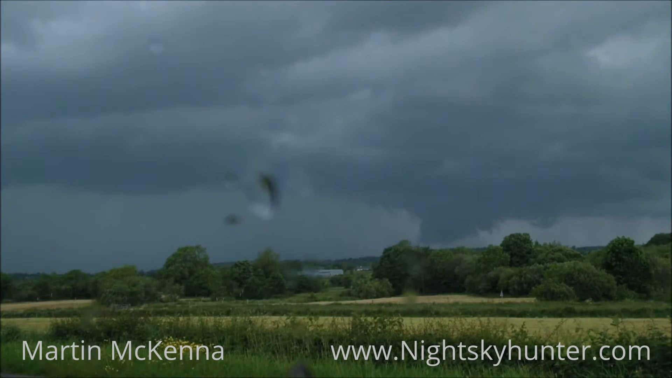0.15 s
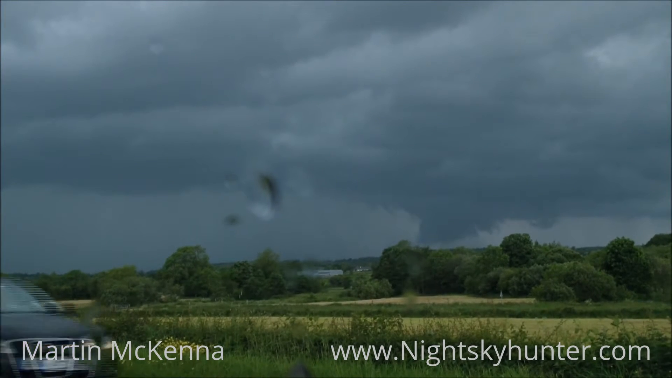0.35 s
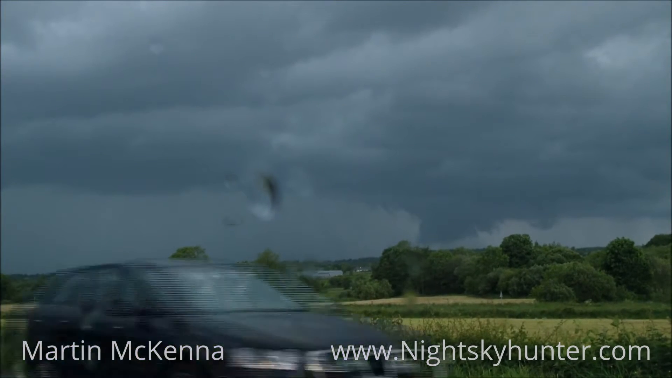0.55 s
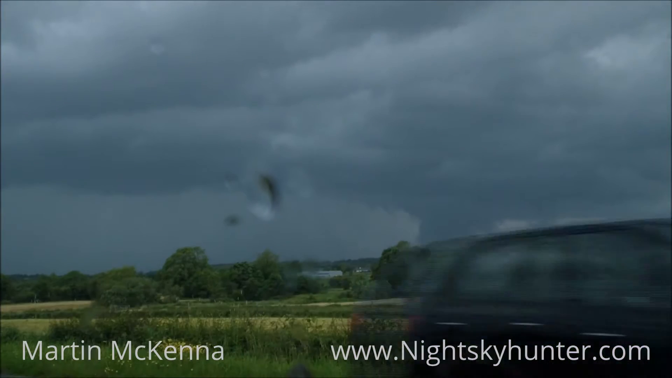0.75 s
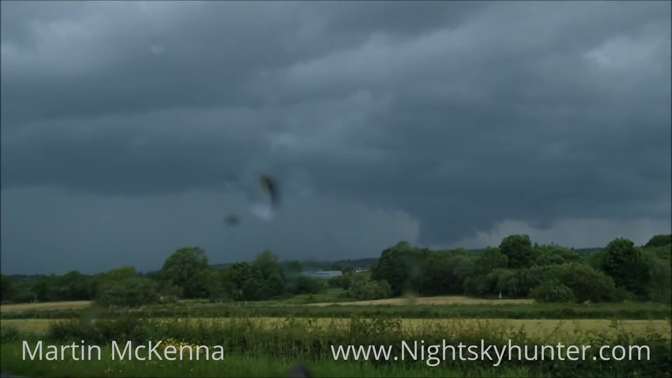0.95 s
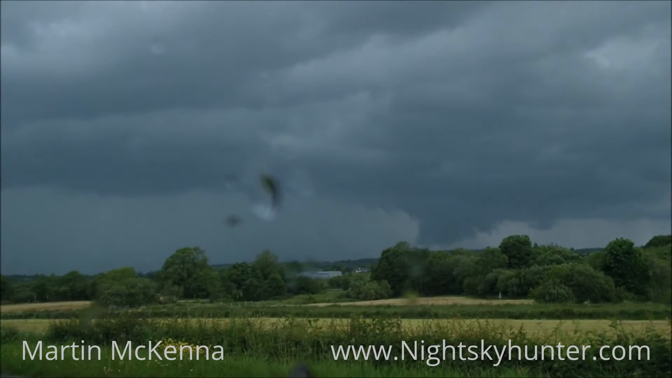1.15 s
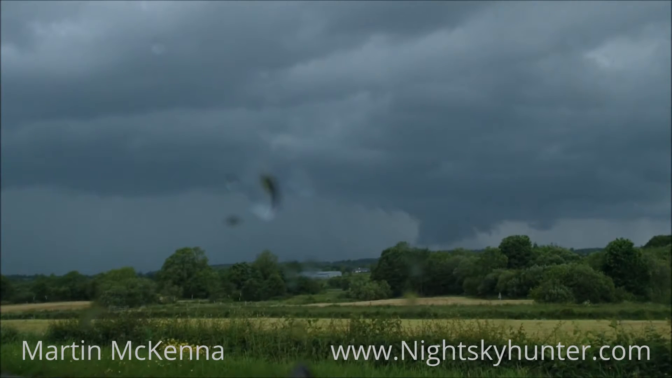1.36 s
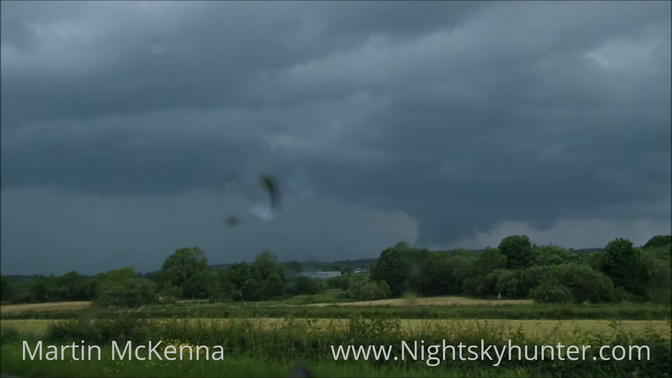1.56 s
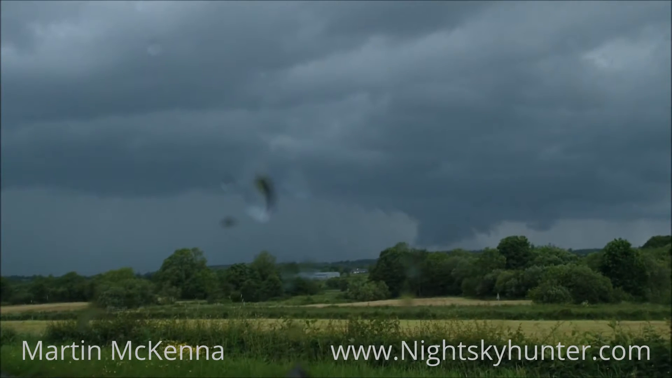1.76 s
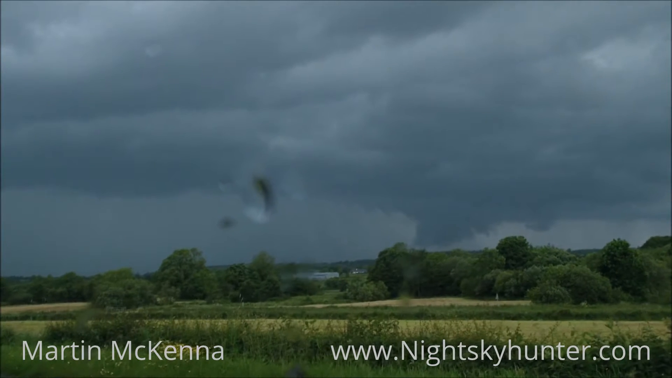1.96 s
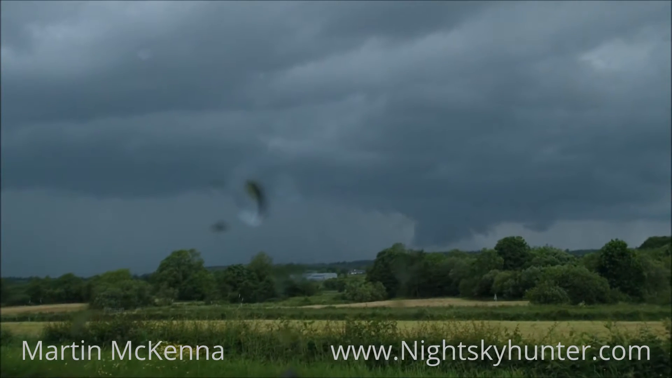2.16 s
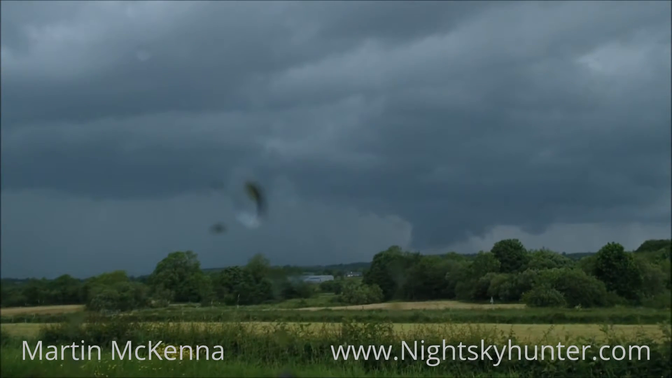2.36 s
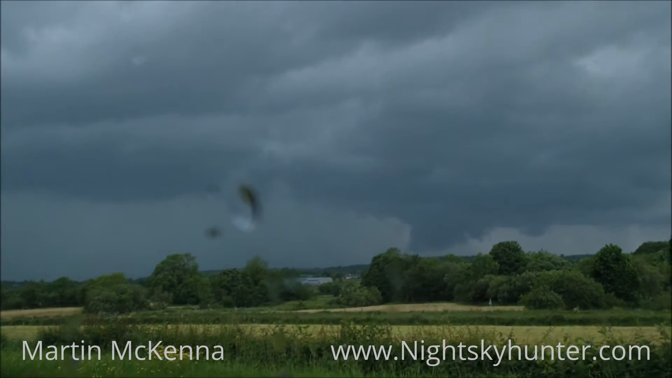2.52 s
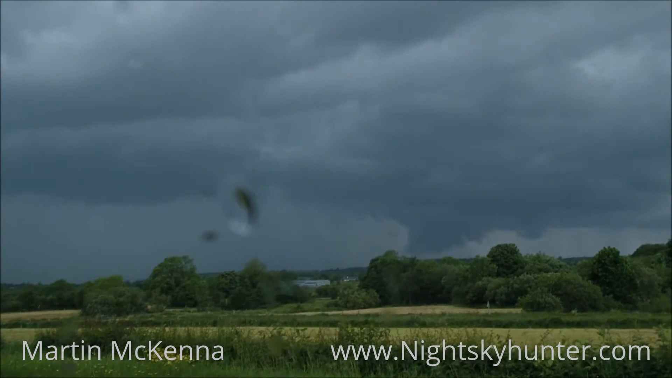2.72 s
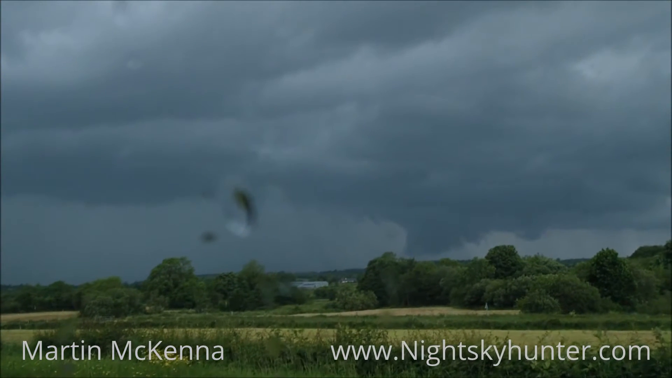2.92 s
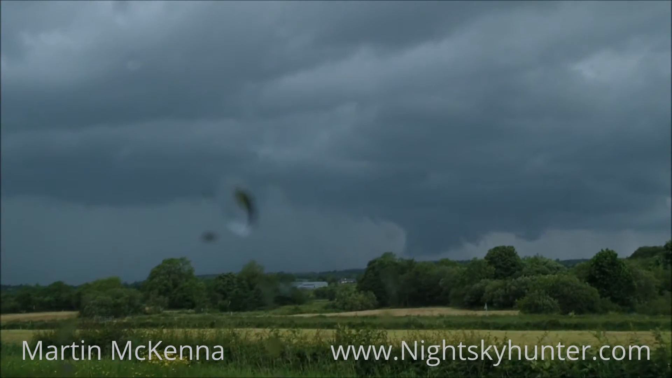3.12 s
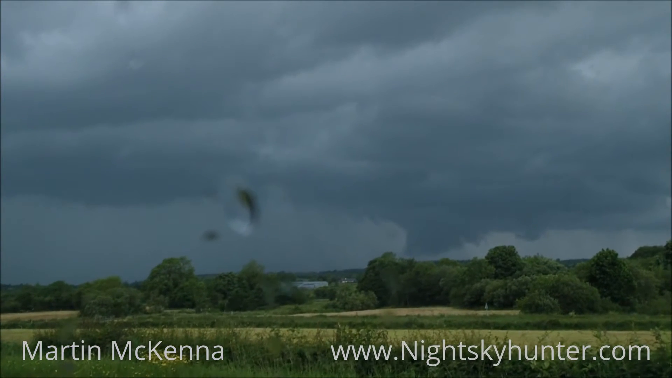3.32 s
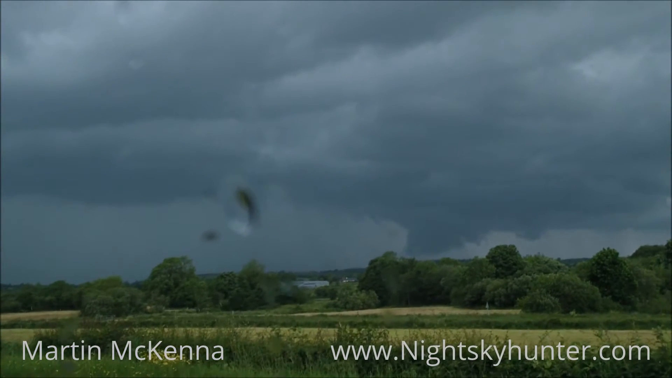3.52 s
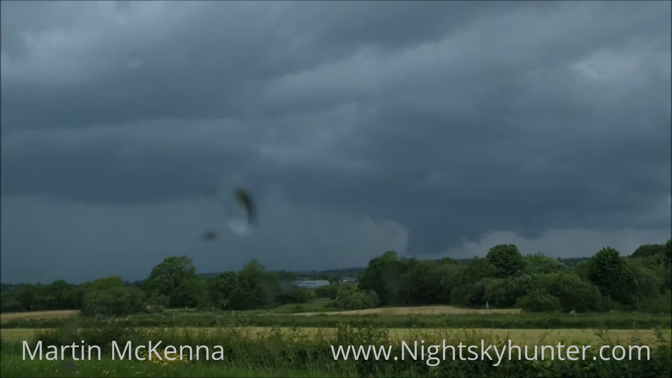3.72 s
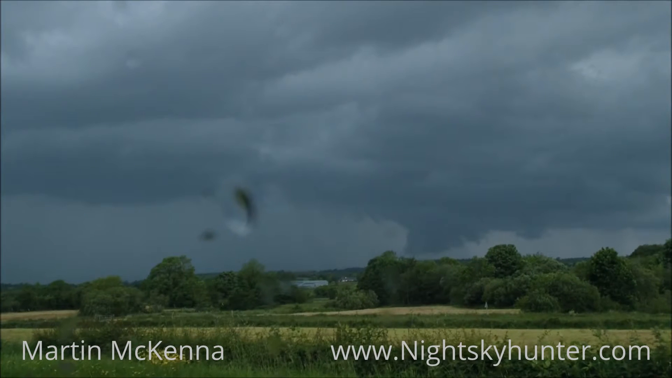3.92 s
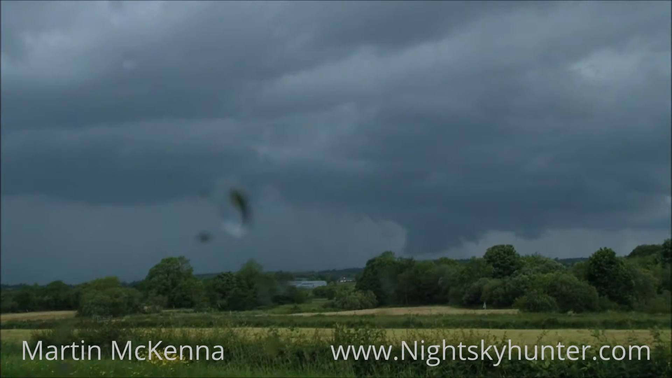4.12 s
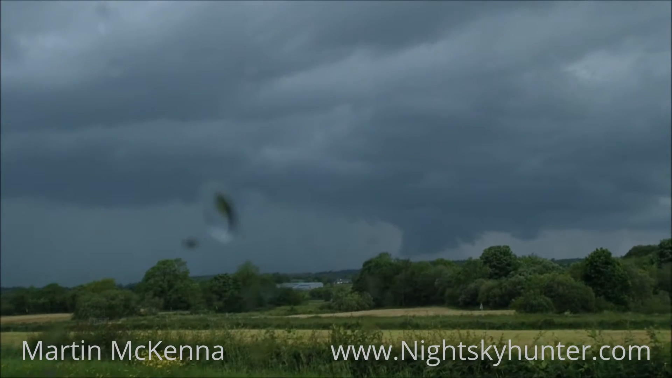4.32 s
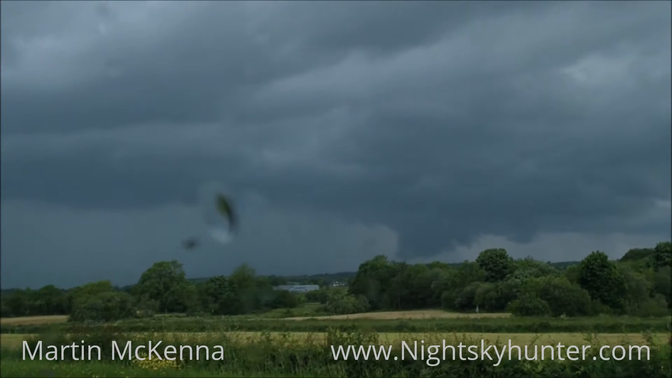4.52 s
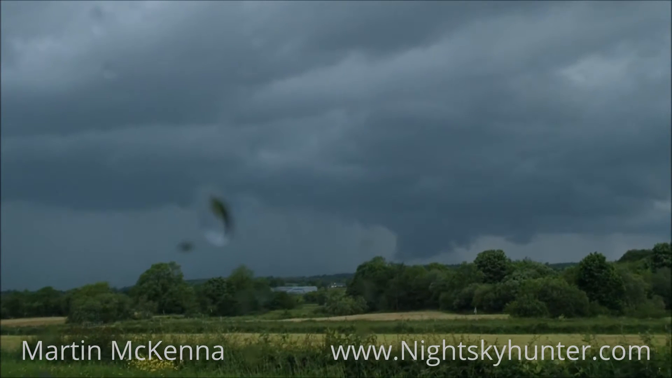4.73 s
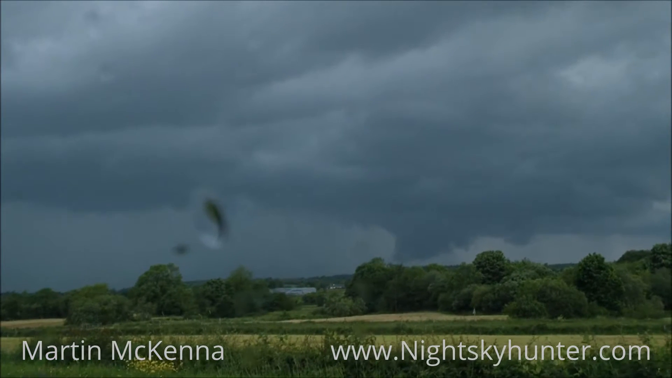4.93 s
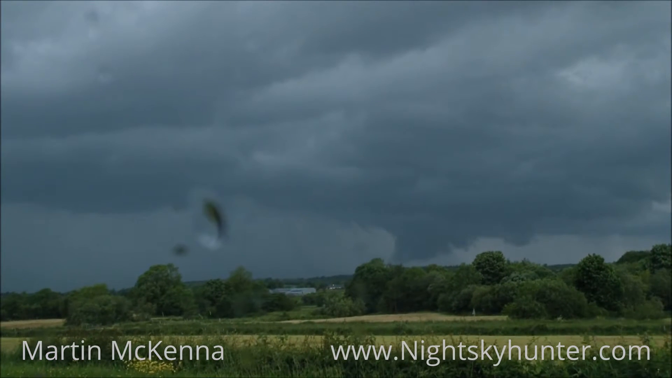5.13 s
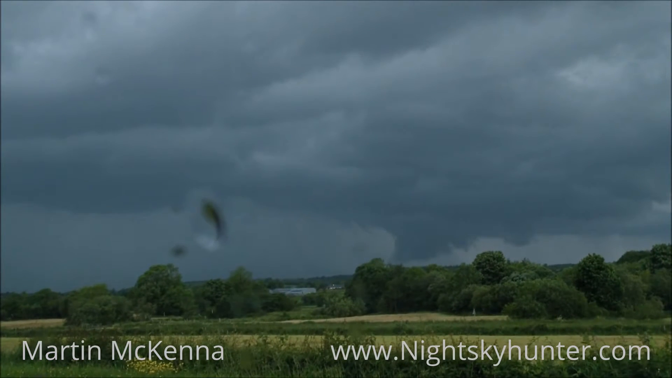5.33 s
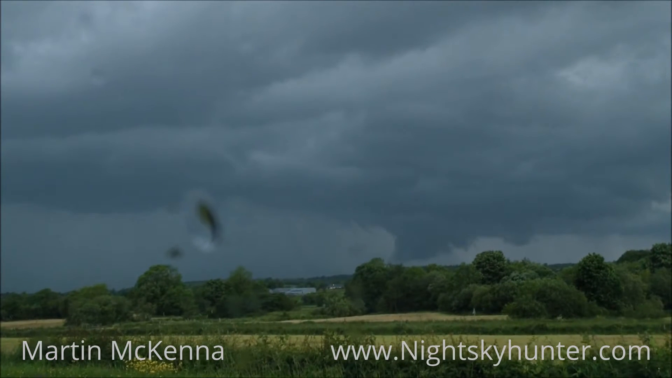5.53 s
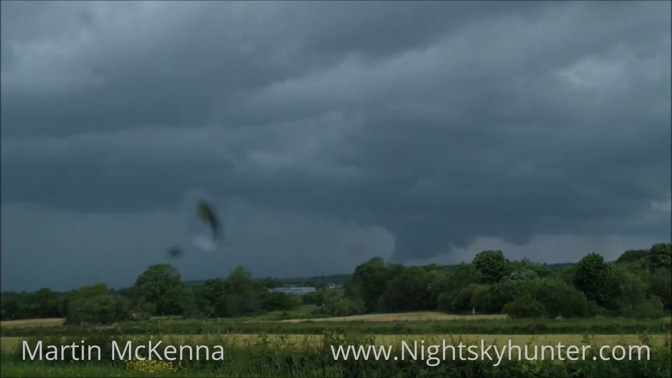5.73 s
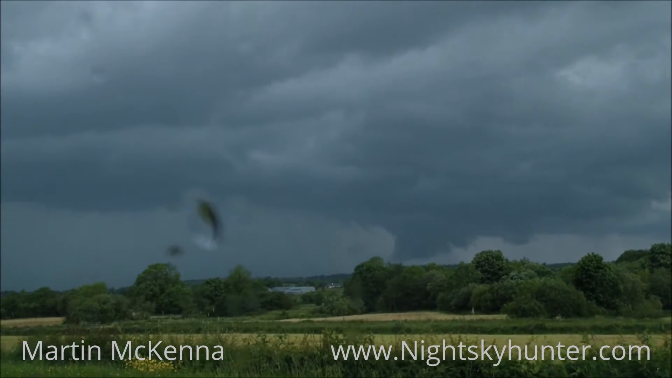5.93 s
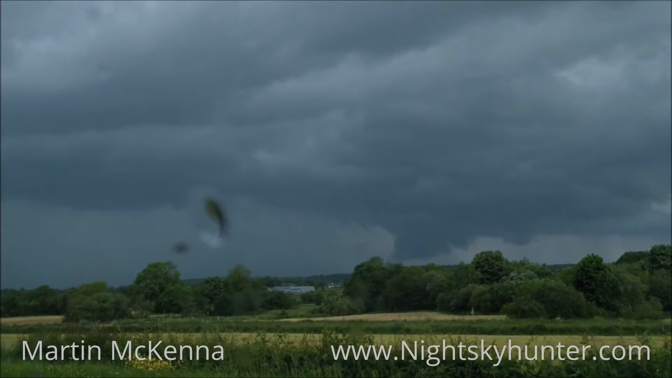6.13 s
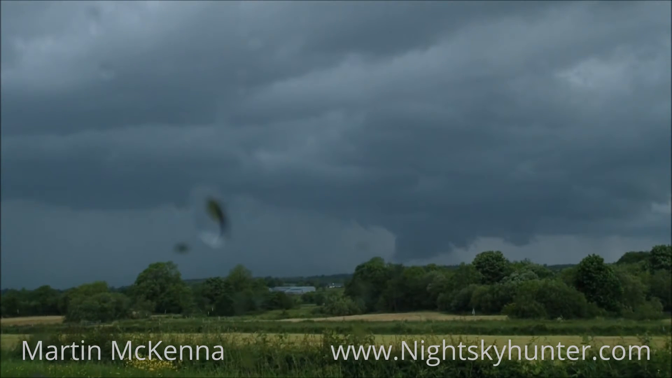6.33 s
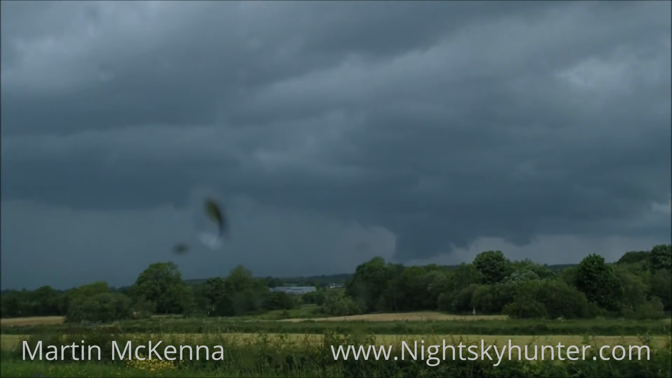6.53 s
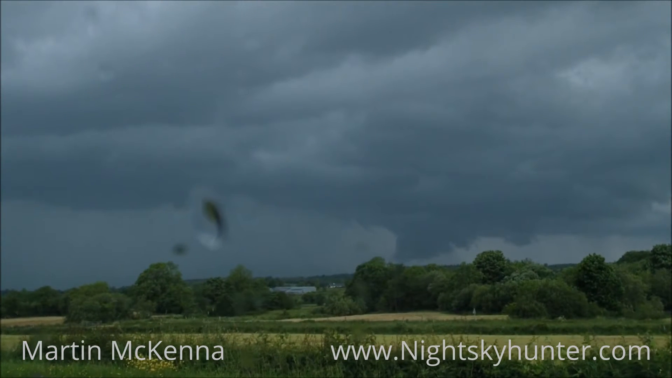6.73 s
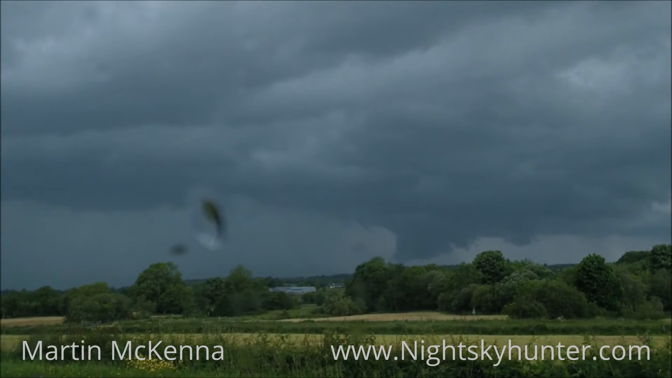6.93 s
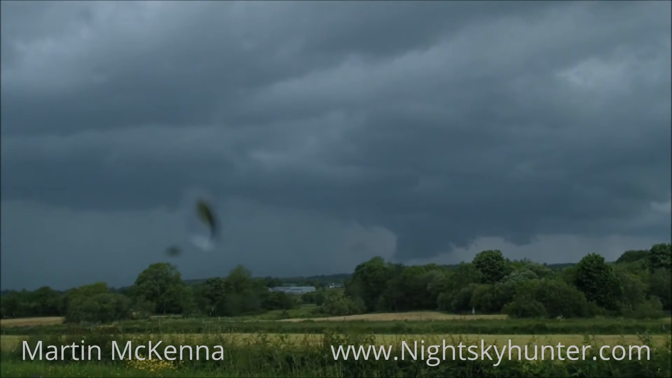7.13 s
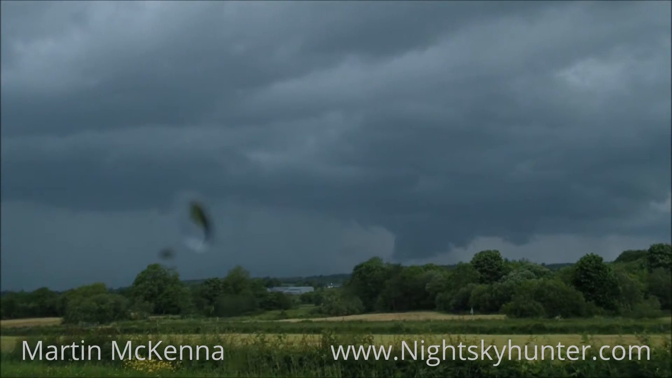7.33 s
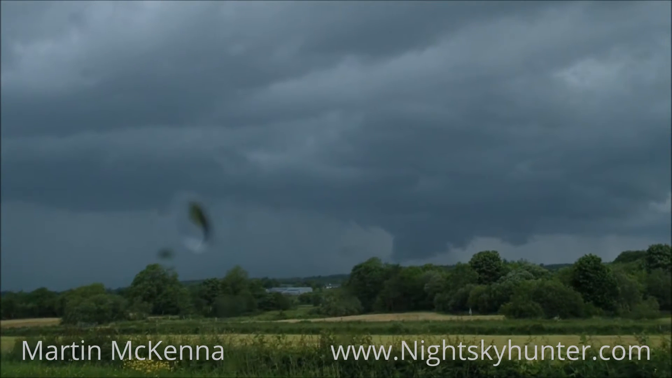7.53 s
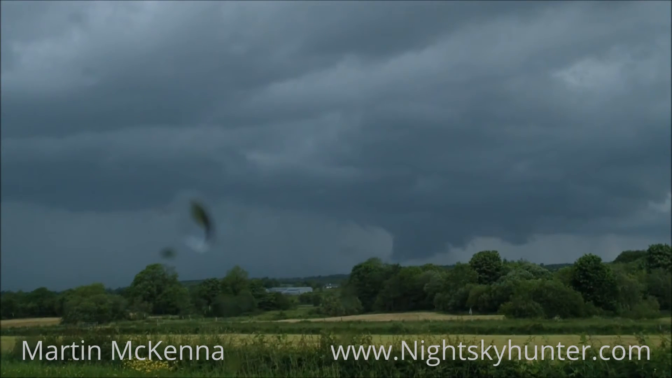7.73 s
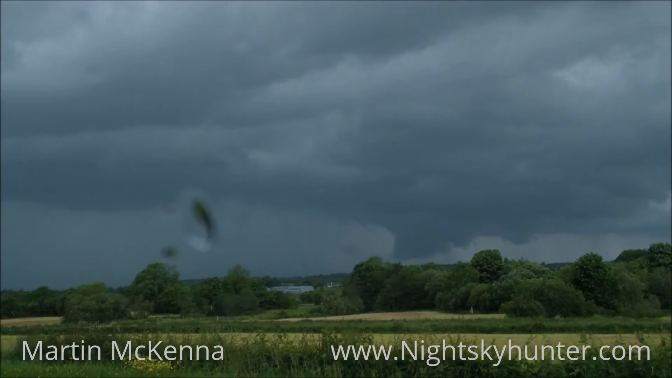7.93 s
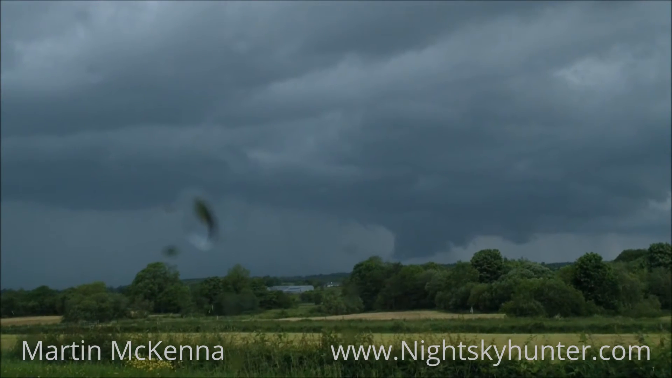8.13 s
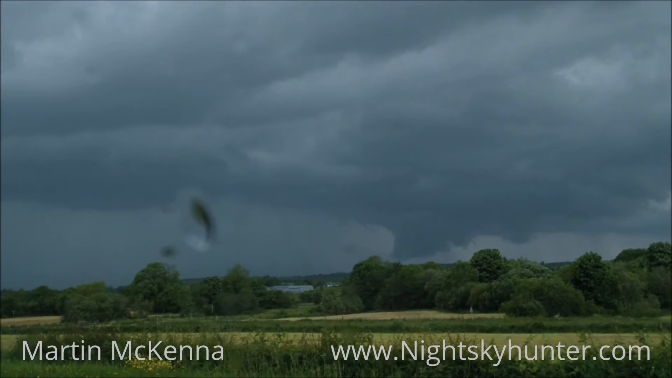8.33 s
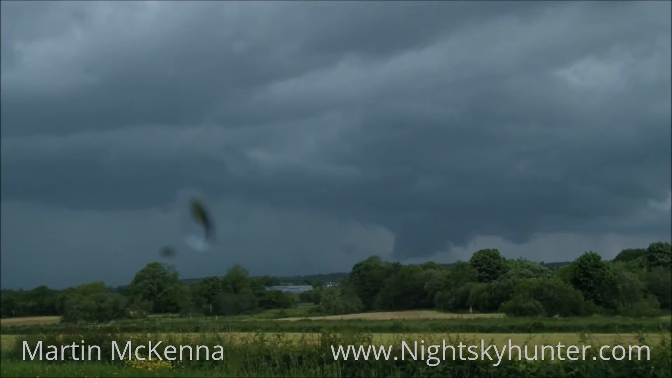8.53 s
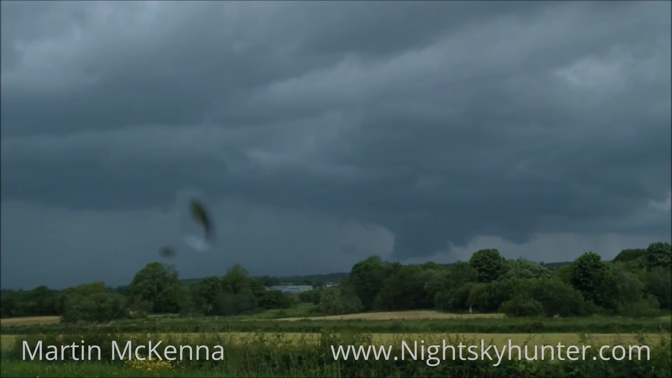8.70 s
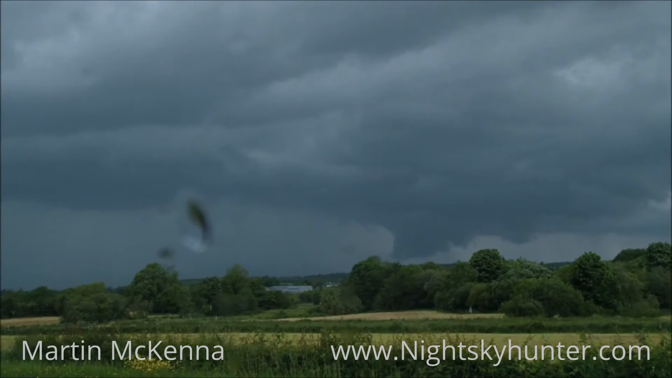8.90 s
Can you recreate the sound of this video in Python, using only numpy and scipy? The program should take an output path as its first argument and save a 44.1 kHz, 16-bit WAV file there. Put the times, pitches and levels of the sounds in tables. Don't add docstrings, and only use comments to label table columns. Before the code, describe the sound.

Close car pass-by heard from inside a parked car, tyre roar swelling and receding, followed by hand scrapes, clicks, knocks, drops and faint hiss.

```python
import sys
import numpy as np
from scipy import signal
from scipy.fft import rfft, irfft, next_fast_len
from scipy.io import wavfile
from scipy.ndimage import uniform_filter1d

SR = 44100
rng = np.random.default_rng(int(sys.argv[2]) if len(sys.argv) > 2 else 0)


def transcribe(u):
    v = np.clip(np.atleast_2d(u).T, -1, 1)
    q = np.round(v * 32767).astype(np.int16)
    wavfile.write(sys.argv[1], SR, q)


def boost_factor(decibels):
    exponent = np.asarray(decibels, float) / 20
    return 10 ** exponent


N = 399546
TIME = np.arange(N) / SR
LONG = next_fast_len(N, real=True)
FREQ = np.maximum(np.arange(LONG // 2 + 1) * SR / LONG, 1.)


def set_rms(x, db):
    return x * boost_factor(db) / np.sqrt(np.mean(x ** 2))


def wave(spectrum):
    return irfft(spectrum, LONG)[..., :N]


def curve(rows):
    s, *columns = np.transpose(rows)
    return np.array([np.interp(TIME, s, c) for c in columns])


def slope(hz, points):
    table_hz, table_db = np.array(points).T
    return np.interp(np.log(hz), np.log(table_hz), table_db)


def resonant(hz, modes):
    response = 1
    for mode_hz, width_hz, db in modes:
        response = response * (1 + (boost_factor(db) - 1) / (1 + 1j * (hz ** 2 - mode_hz ** 2) / (hz * width_hz)))
    return response


def walk(rate, size=N):
    k = int(SR / rate)
    held = np.repeat(rng.standard_normal(size // k + 1), k)
    return uniform_filter1d(uniform_filter1d(held, k), k)[:size]


def swell(start_s, length_s):
    return np.sin(np.pi * np.clip((TIME - start_s) / length_s, 0, 1))


def ring(t, hz, t60, rise_s):
    return (1 - np.exp(-t / rise_s)) * 1000 ** (-t / t60) * np.sin(2 * np.pi * hz * t)


def apart(hz, corner_hz=7500, least=0.035):
    return least + (1 - least) / np.sqrt(1 + (corner_hz / hz) ** 3)


def ports(mid, side):
    return np.array([mid + side, mid - side])


def add(out, s, x):
    i = int(s * SR)
    out[..., i:i + x.shape[-1]] += x[..., :N - i]


SPEED_M_S, KERB_M, ABEAM_S = 18, 3.11, .8


def passing(lag_s):
    along = SPEED_M_S * (TIME - ABEAM_S - lag_s)
    r = np.hypot(along, KERB_M)
    return r, -along / r


# t/s, level/dB
SCREEN = [(0, 0), (.22, 1), (.5, 1.5), (.65, -1), (.9, -1), (1.15, 2.5), (1.3, 0.5), (1.5, -2), (1.8, -2),
          (2.2, -0.5), (2.35, -3), (3.0, -3), (3.4, -2), (4.75, -1.5), (5.3, -4), (6.4, -13), (9.06, -17)]
# level abeam/dB, share of the path loss, extra level ahead of the car/dB,
# level of far traffic/dB
LAYERS = [
    (-27.5, 1.17, -2, -51.5),
    (-26.5, 0.99, 5.5, -53.5),
    (-22.5, 0.75, 7, -50),
    (-36, 1.34, 2.5, -64),
]
SPREAD_M = 3.74


def loudness():
    r, coming = passing(0)
    loss = curve(SCREEN)[0] - 20 * np.log10(np.hypot(r, SPREAD_M) / np.hypot(KERB_M, SPREAD_M))
    ahead = np.clip(2 * coming, 0, 1)
    layers = []
    for db, share, ahead_db, far_db in LAYERS:
        power = boost_factor(2 * (db + share * loss + ahead_db * ahead)) + boost_factor(2 * far_db)
        layers.append(10 * np.log10(power))
    return layers


LAYER_HZ = (70, 350, 950, 4000)
# f/Hz, level/dB per Hz
CAR_COLOUR = [(20, -5.5), (40, -12.5), (130, -10.5), (210, -10), (330, -18.5), (550, -18), (1020, -17.5),
              (1490, -27), (2100, -30.5), (2500, -34), (4800, -45), (5600, -47.5), (11000, -54),
              (16000, -63)]
# f/Hz, width/Hz, level/dB
CABIN = [(60, 6.6, 6.5), (83, 14, 4), (112.6, 7.7, 6), (237, 25, 2.5), (327, 24, 4), (399.4, 61, -10),
         (459.7, 21.6, 7.5), (622, 13, 5.5), (716.3, 9.2, 10.5), (766.4, 15.4, 7.5), (823.5, 18, 10),
         (903.6, 9.9, 13.5), (950.2, 14.2, 10.5), (988.7, 21.2, 11), (1024.5, 5.4, 11.5), (1085, 22, 1),
         (1223.5, 32, 9), (1337, 23.5, 8.5), (1377, 29, 3.5), (1507, 24, 8), (1744, 33, 7.5),
         (2090, 31, 3.5), (2280, 420, -2.5), (3170, 84, 4.5)]


def road():
    flicker_db, smooth_hz, steady_within_m = 2.0, 900, 30
    loud = loudness()
    shimmer = np.clip(passing(0)[0] / steady_within_m, .25, 1)
    colour = boost_factor(slope(FREQ, CAR_COLOUR)) * resonant(FREQ, CABIN)
    mid, side = rfft(rng.standard_normal((2, LONG))) * colour / np.sqrt(N)
    pair = ports(mid, apart(FREQ) * side)
    rms = []
    for low_hz, high_hz in [(25, 140), (230, 550), (600, 1500), (2500, 7000)]:
        inside = (FREQ > low_hz) & (FREQ < high_hz)
        rms.append(np.sqrt(2 * np.sum(np.abs(colour[inside]) ** 2) / N))
    out = 0
    for step in range(-1, 20):
        hz = 25 * 2 ** (step / 2)
        window = np.cos(np.pi * np.clip(np.log2(FREQ / hz), -.5, .5)) ** 2
        place = np.interp(np.log(hz), np.log(LAYER_HZ), range(4))
        k = min(int(place), 2)
        share = place - k
        flicker = flicker_db * shimmer * min(1, (smooth_hz / hz) ** .5) * walk(14)
        db = (1 - share) * loud[k] + share * loud[k + 1] + flicker
        gain = boost_factor(db) / (rms[k] ** (1 - share) * rms[k + 1] ** share)
        out = out + gain * wave(window * pair) * np.sqrt(N)
    return out


# t/s, length/s, f/Hz, width/Hz, level/dB
FACING = [(-0.13, 0.81, 4150, 610, -47.5), (-0.9, 1.75, 7600, 1200, -51), (-.5, 1.3, 1570, 530, -34),
          (0.4, 0.52, 2660, 300, -38), (0.8, 2, 3500, 400, -58), (0.8, 1.3, 5260, 550, -61),
          (0.64, 0.51, 236, 98, -25.5), (0.6, 0.67, 9000, 2500, -52), (1.1, .27, 7000, 2000, -51),
          (0.7, .13, 8000, 4000, -47), (1.5, 0.34, 3200, 60, -54), (0.27, 0.37, 826, 55, -25),
          (1.9, 0.69, 3200, 60, -62), (3, 2.04, 400, 7.3, -50.5), (0.5, 0.52, 615, 77, -26),
          (-0.09, 0.88, 1095, 56, -24), (0.13, 0.33, 800, 80, -30), (1.94, 0.36, 810, 70, -39),
          (0.9, 0.24, 322, 13, -30), (0.3, 0.17, 314, 16, -33), (0.3, 0.44, 220, 71, -31),
          (0.51, 0.58, 166, 29, -22.5), (-0.12, 0.31, 950, 93, -20.5)]


def facing():
    mid, side = rfft(rng.standard_normal((2, LONG)))
    noise = ports(mid, apart(FREQ) * side)
    out = 0
    for s, length, hz, width, db in FACING:
        band = noise * np.exp(-((FREQ - hz) / width) ** 2)
        out = out + swell(s, length) * set_rms(wave(band), db)
    return out


# t/s, f/Hz
REVS = [
    (0, 180),
    (2.2, 180),
    (2.9, 183),
    (3.8, 185.4),
    (4.7, 186.8),
    (5.4, 185.3),
    (7, 180),
    (9.06, 179),
]
# t/s, level/dB
THROTTLE = [(0, -36), (.4, -28), (.58, -28), (.76, -15), (.88, -11.5), (1.0, -13), (1.11, -16.5),
            (1.25, -24), (1.55, -32), (1.75, -30.5), (2.05, -42.5), (2.4, -45), (2.9, -39), (3.35, -44),
            (3.8, -39.5), (4.45, -43), (4.95, -47.5), (5.3, -56.5), (9.06, -52)]
# t/s, length/s, f/Hz, level/dB
ENGINE_RING = (1.1, 0.27, 257.5, -29)
# t/s, half length/s, level/dB
PILLAR = (.84, .021, -13)


def exhaust():
    tailpipe_lag_s, waver_db, half_order_db = 0.1842, 0.6, -24
    coming = passing(tailpipe_lag_s)[1]
    hz = curve(REVS)[0] / (1 - coming * SPEED_M_S / 343)
    turn = 2 * np.pi * np.cumsum(hz) / SR
    s, half, hidden_db = PILLAR
    hidden = hidden_db * np.exp(-((TIME - s) / half) ** 4)
    db = curve(THROTTLE)[0] + hidden + waver_db * walk(20)
    tone = boost_factor(db) * (np.sin(turn) + boost_factor(half_order_db) * np.sin(turn / 2))
    s, length, ring_hz, ring_db = ENGINE_RING
    higher = boost_factor(ring_db) * swell(s, length) * np.sin(turn * ring_hz / 172)
    return np.sqrt(2) * (tone + higher)


# f/Hz, width/Hz, level/dB
SHELL = [(266.1, 124, 18.5), (816, 226, 12.5), (1620, 170, -2.5), (2135, 89, -10), (2320, 160, -4.5),
         (2590, 100, -6), (3830, 370, 4.5), (5100, 200, -1), (5270, 125, 6.5), (8500, 190, 3.5),
         (12300, 900, 2.5)]


def tick(noise, db, bass_db, edge_db, top_db, t60, rise_s=0.00094):
    treble_life, crack, crack_s = 0.69, 1.4, 0.00096
    t = np.arange(noise.shape[1]) / SR
    hz = np.maximum(np.arange(len(t) // 2 + 1) * SR / len(t), 1.)
    shape = [(80, bass_db - 16), (300, bass_db), (1300, bass_db / 2 + edge_db / 2 + 6.0),
             (2100, edge_db + 14.0), (3000, edge_db + 9.5), (4000, -0.1), (5200, 1.1), (5900, -1.3),
             (6900, top_db + 9.0), (16000, top_db + 0.5)]
    start = noise * (1 - np.exp(-t / rise_s)) * (1 + crack * np.exp(-t / crack_s))
    slow = rfft(start * 1000 ** (-t / t60))
    quick = rfft(start * 1000 ** (-t / (treble_life * t60)))
    treble = 1 / (1 + (3800 / hz) ** 8)
    body = boost_factor(slope(hz, shape)) * resonant(hz, SHELL)
    mid, side = ((1 - treble) * slow + treble * quick) * body
    middle = irfft(mid * (hz > 3500) * (hz < 8000), len(t))
    pair = irfft(ports(mid, apart(hz, corner_hz=9000) * side), len(t))
    return pair * boost_factor(db) / np.abs(middle).max()


# t/s, peak level/dB, edge share/dB, top share/dB
TICKS = [(1.4254, -34, -15, -23), (1.8783, -36.5, -13, -13), (1.9112, -37, -10, -8), (1.9435, -33, -13, -5),
         (1.9305, -27, -6, -7), (1.9685, -21, -16.5, -5), (1.9764, -25.5, -1.5, -2),
         (2.0202, -20.5, -11.5, -12.5), (2.073, -38, -12, -3), (3.03, -45, -8, -18),
         (7.105, -46.5, -4, -20), (7.285, -45, -9, -18), (7.43, -45, -8, -14), (2.2513, -36.5, -9, -16),
         (2.4612, -20, -9.5, -24.5), (2.5935, -32.5, -11, -24), (2.6519, -44, -3, -18),
         (2.8145, -29.5, -4.5, -22), (2.8254, -37.5, 1, -10), (2.9257, -41, -2.5, -18),
         (3.2994, -43, -15, -12), (3.712, -36.5, -6, -17), (3.8194, -45, -17, 0), (5.1094, -40.5, -16, -10),
         (5.9797, -46, -3, -7), (6.4621, -41, -5, -10), (6.565, -36.5, -9.5, -18), (7.0712, -38.5, -17, -7),
         (7.0844, -41, -13, -11), (7.2235, -31, -13.5, -19), (7.3696, -44, -12, -13),
         (7.4659, -40, -4, -12), (7.9783, -36, -9, -17), (8.19, -41.5, -5, -13), (8.4337, -35, -4.5, -4),
         (8.7016, -39.5, -9, -22), (8.773, -43, -10, 2)]
# t/s, peak level/dB, edge share/dB, top share/dB
TAPS = [(4.5104, -54, 6, -12), (4.598, -48.5, 2, -12), (4.685, -19.5, 2, -2), (4.8677, -32.5, -3, -19),
        (4.9294, -45, -6, -12), (5.2744, -52, 3, -6), (5.3316, -50, 0, -15), (6.2324, -50.5, 1, -16),
        (6.6695, -41, -7, -14), (6.723, -38, -0.5, -13), (6.9915, -54.5, -6, -14),
        (7.029, -46.5, -3.5, -13), (7.6592, -52, 0, -12.5), (7.867, -48, -5, -14), (7.9366, -47.5, -2, -22),
        (8.4967, -43.5, 1.5, -14), (8.6839, -45, -5.5, -18)]


def ticks_and_taps():
    out = np.zeros((2, N))
    for rows, bass_db, t60, rise_s in (TICKS, -14.5, 0.063, 0.00042), (TAPS, 0.5, 0.057, 0.0038):
        for s, db, edge_db, top_db in rows:
            noise = rng.standard_normal((2, 4096))
            add(out, s, tick(noise, db, bass_db, edge_db, top_db, t60, rise_s))
    return out


# t/s, level/dB, t60/s
RUSTLES = [(2.471, -42.5, 0.59), (3.26, -47.5, 0.14), (3.799, -48.5, 0.13), (4.78, -56, .15),
           (4.89, -42, .2), (5.08, -48, 0.25), (6.06, -49, 0.18), (6.48, -48.5, 0.15), (6.58, -47.5, 0.18),
           (6.78, -46.5, 0.32), (6.88, -48.5, 0.1), (7.02, -48, 0.29), (7.1, -59, 0.11), (7.901, -50, 0.22),
           (8.505, -45, 0.22), (8.57, -46, 0.18), (8.9, -46, 0.51), (9.009, -51, 0.13), (7.803, -50.5, 0.1),
           (8.7, -51, .2)]


def rustles():
    out = np.zeros((2, N))
    for s, db, t60 in RUSTLES:
        grains = rng.standard_normal((2, 8192)) * boost_factor(7.1 * walk(120.0, size=8192))
        add(out, s, tick(grains, db, 4.7, -5.0, -11.0, t60, rise_s=0.012))
    return out


def creaks():
    creak_db, spread_db, count = -55, 8.0, 110
    out = np.zeros((2, N))
    for s, a, b in rng.random((count, 3)):
        noise = rng.standard_normal((2, 4096))
        faint = tick(noise, creak_db + spread_db * a, -12, -14 + 8 * b, -14, 0.082)
        add(out, 2.2 + s * (N / SR - 2.3), faint)
    return out


# start t/s, end t/s, level/dB
SLIDES = [
    (1.886, 1.964, -43),
    (1.954, 1.998, -37.5),
    (1.983, 2.084, -43),
]


def sliding_finger():
    grip_s, lift_s = 0.028, 0.018
    colour = [(1200, -30), (2500, 3), (5000, 3.0), (12000, -4.5), (16000, -10)]
    mid, side = rfft(rng.standard_normal((2, LONG))) * boost_factor(slope(FREQ, colour))
    rub = set_rms(wave(ports(mid, apart(FREQ) * side)), 1.8)
    touch = 0
    for a, b, db in SLIDES:
        touch = touch + boost_factor(db) * np.clip(np.minimum((TIME - a) / grip_s, (b - TIME) / lift_s), 0, 1)
    return rub * touch * boost_factor(3.6 * walk(430))


# t/s, length/s, start f/Hz, end f/Hz, level/dB
SQUEAKS = [(1.897, .026, 5000, 5300, -42), (1.932, .02, 5300, 5100, -43), (1.998, .016, 4950, 4550, -38),
           (2.02, .012, 3650, 3320, -35), (2.032, .02, 4750, 4900, -34), (2.05, .024, 4900, 4950, -29.5),
           (2.078, .01, 4950, 4900, -41), (2.287, .0036, 8000, 8000, -45), (2.4617, .003, 5200, 5100, -27),
           (2.6, .04, 2090, 2080, -50), (2.815, .008, 2050, 2000, -36), (2.815, .008, 2700, 2650, -38),
           (2.815, .008, 4800, 4900, -37), (3.215, .01, 5500, 5500, -54), (3.27, .012, 4700, 4600, -55),
           (3.29, .012, 5300, 5000, -54), (4.684, .012, 2160, 2200, -22.5), (8.929, .005, 4950, 4400, -48),
           (8.961, .005, 4600, 4000, -49), (8.983, .005, 4650, 4250, -47)]


def squeaks():
    out = np.zeros((2, N))
    for s, length, from_hz, to_hz, db in SQUEAKS:
        u = np.linspace(0, 1, int(length * SR * 1.31))
        hz = from_hz + (to_hz - from_hz) * np.sqrt(u) + 110 * walk(300, size=len(u))
        loud = boost_factor(db + 4.1 * walk(700, size=len(u))) * np.sqrt(np.sin(np.pi * u))
        add(out, s, loud * np.sin(2 * np.pi * np.cumsum(hz) / SR))
    return out


def handling():
    return ticks_and_taps() + rustles() + creaks() + sliding_finger() + squeaks()


# t/s, level/dB
KNOCKS = [(3.4, -41), (4.585, -27.5), (4.68, -21.5), (5.4, -27), (5.335, -33), (6.155, -36), (6.668, -35),
          (6.72, -31), (7.04, -37), (8.6, -39), (10, -37), (7.3, -34), (8.5, -30), (8.518, -35),
          (8.54, -36)]
# f/Hz, level/dB, t60/s
HOUSING = [(85.4, -4.5, 0.094), (186, -1.5, 0.11), (286, -1.5, 0.041), (403, -2.5, 0.076), (545, -3, 0.083),
           (700, 1, 0.029), (917, -11, 0.062)]


def knocks():
    out, t = np.zeros(N), np.arange(4096) / SR
    for s, db in KNOCKS:
        for hz, mode_db, t60 in HOUSING:
            c = rng.standard_normal()
            add(out, s, boost_factor(db + mode_db + 1.5 * c) * ring(t, hz * (1 + 0.032 * c), t60, 0.0035))
    return out


# t/s, level/dB, f/Hz
PINGS = [
    (2.885, -22.5, 997),
    (3.189, -26.5, 1010),
    (3.646, -20.5, 980),
    (3.827, -30, 990),
    (4.23, -22, 960),
    (4.679, -17, 278),
    (8.913, -36, 891),
    (8.943, -36, 830),
]


def pings():
    out, t = np.zeros(N), np.arange(4096) / SR
    for s, db, hz in PINGS:
        add(out, s, boost_factor(db + 0.5) * ring(t, hz, t60=0.055, rise_s=.002))
    return out


# t/s, level/dB, pitch factor
THUMPS = [
    (6.23, -15.5, 0.93),
    (7.662, -18.5, 0.92),
]
# f/Hz, level/dB, t60/s
ROOF = [(45, -18, 0.46), (54.5, -3, 0.37), (77.9, -10, 0.4), (97.4, -1, 0.22), (159.5, 5.5, 0.1),
        (287, 0, 0.081), (200, -9.5, 0.24), (431, -10, 0.085), (600, -13, 0.086), (737, -22, 0.08),
        (517, -14.5, 0.085), (687, -18, .09), (870, -23, .08)]


def roof():
    travel, bloom = 0.63, 0.31
    out, t = np.zeros(N), np.arange(SR // 2) / SR
    for s, db, pitch in THUMPS:
        for hz, mode_db, t60 in ROOF:
            late = np.maximum(t - travel / hz, 0)
            add(out, s - travel / 270, boost_factor(db + mode_db) * ring(late, hz * pitch, t60, bloom / hz))
    return out


# t/s, half length/s, level/dB
GUSTS = [
    (.42, 0.11, -39),
    (.95, 0.25, -43),
    (2.47, 0.28, -39.5),
    (3.13, 0.18, -49),
    (4.734, .2, -48),
    (5.5, .2, -59),
    (6.226, 0.25, -46),
    (7.5, 0.31, -49),
    (8.7, .2, -63),
]


def buffet(hz=25, width=7, calm_db=-55):
    shake = wave(rfft(rng.standard_normal(LONG)) * np.exp(-((FREQ - hz) / width) ** 2))
    push = boost_factor(calm_db)
    for s, half, db in GUSTS:
        push = push + boost_factor(db) * np.exp(-((TIME - s) / half) ** 2)
    return set_rms(shake, 0) * push


# f/Hz, level/dB
PORTS_DB = [(100, -2.1), (500, -2), (1100, -3.5), (2500, -1.9), (5000, -1.5), (12000, -1.5)]


def scene():
    left_lead_s = 8.5e-6
    sound = road() + facing() + buffet() + exhaust() + handling() + knocks() + pings() + roof()
    tilt = np.log(10) / 40 * slope(FREQ, PORTS_DB) + 1j * np.pi * FREQ * left_lead_s
    return wave(rfft(sound, LONG) * np.exp([tilt, -tilt]))


def band_limit(x):
    return signal.sosfilt(signal.butter(12, 16680, fs=SR, output="sos"), x)


# f/Hz, level/dB per Hz
MIC_HISS = [(15, -31), (25, 12), (76, -8), (545, -9.5), (962, -18), (1100, -30), (1560, -17), (16000, -25)]


def record(dry):
    hiss_db, whine_hz, whine_db, top_hz = -49.5, 15650, -72, 15800
    hiss = set_rms(wave(rfft(rng.standard_normal((2, LONG))) * boost_factor(slope(FREQ, MIC_HISS))), hiss_db)
    whine = np.sqrt(2) * boost_factor(whine_db) * np.sin(2 * np.pi * whine_hz * TIME)
    low_pass = signal.ellip(10, .2, 45, top_hz, fs=SR, output="sos")
    mix = signal.sosfilt(low_pass, dry + hiss + whine)
    return band_limit(mix)


dry = scene()
out = record(dry)
transcribe(out)
```